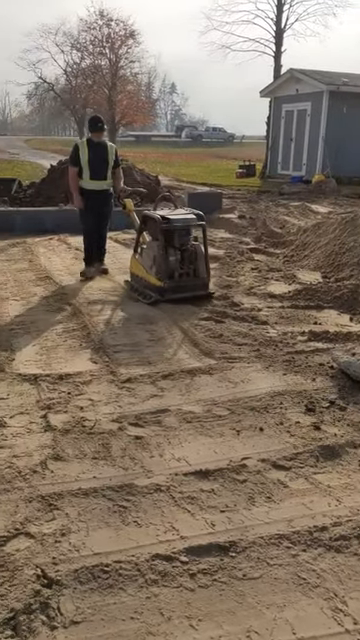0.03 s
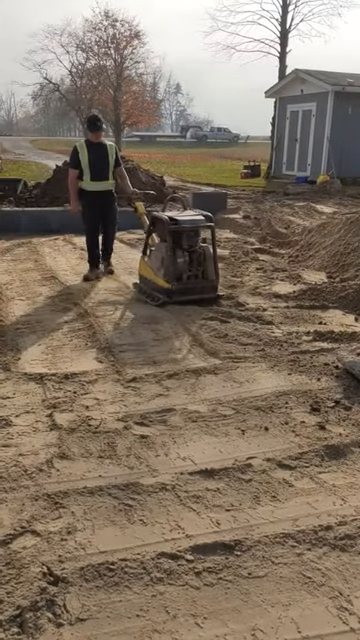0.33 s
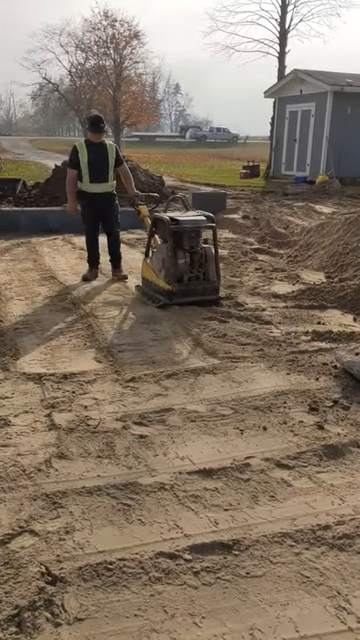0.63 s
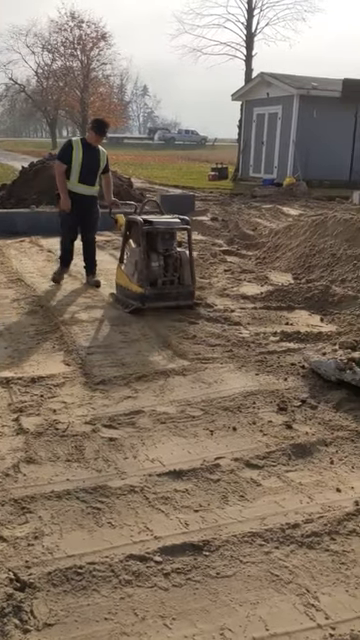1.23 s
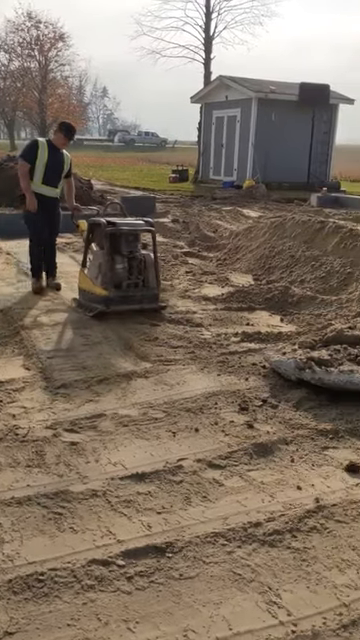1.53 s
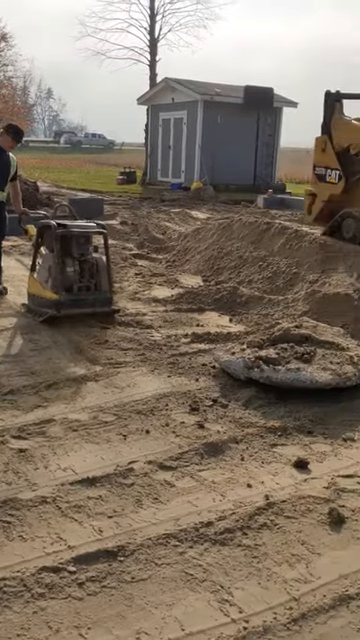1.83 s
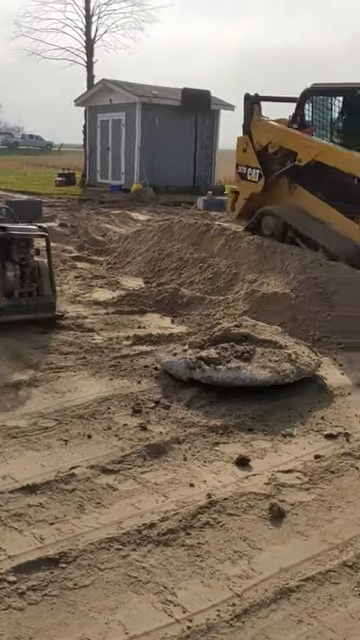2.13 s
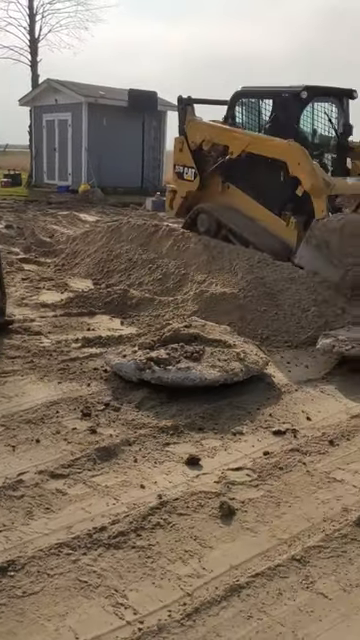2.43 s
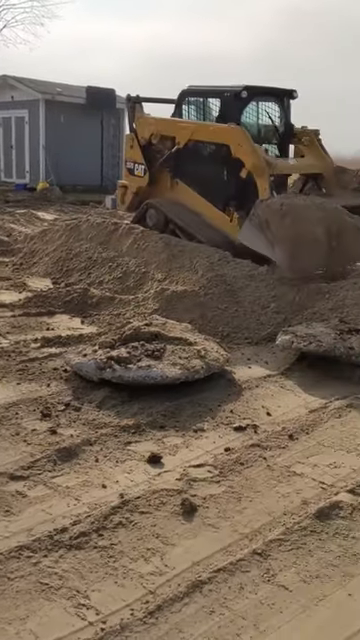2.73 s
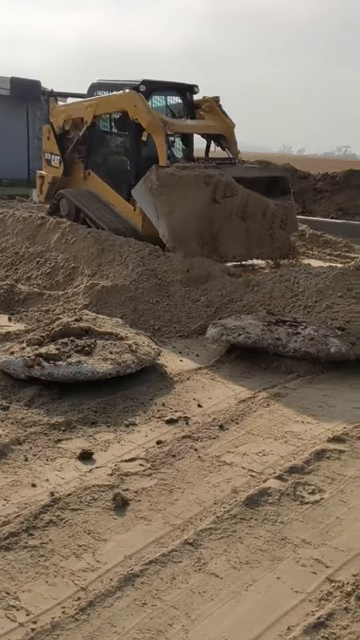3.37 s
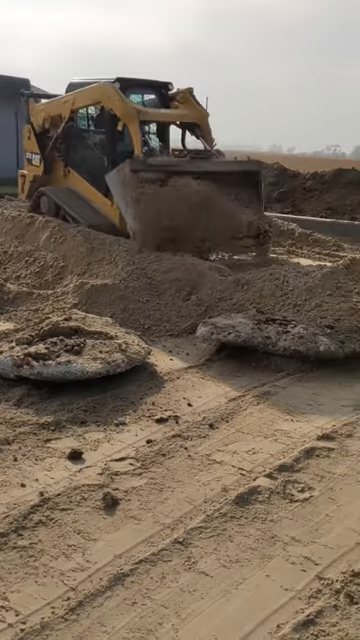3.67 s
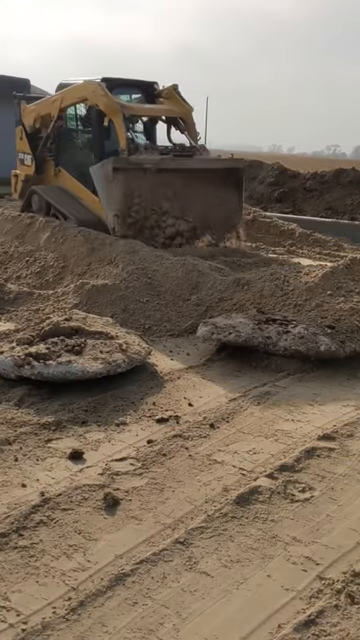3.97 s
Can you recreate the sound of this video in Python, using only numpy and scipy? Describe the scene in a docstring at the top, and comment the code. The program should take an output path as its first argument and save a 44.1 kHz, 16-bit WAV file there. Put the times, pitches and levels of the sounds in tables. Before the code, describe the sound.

Steady pulsing drone and diesel clatter of a plate compactor, with a loader faintly behind.

```python
"""A plate compactor works on sand a few metres away, in open air, beside a tracked loader.
From the start the plate thumps 65 times a second and the ground rumbles, while its one-cylinder diesel
knocks, barks and ticks once in every two turns and the loader's tracks moan. Within a second the guard
frame buzzes and a faint hydraulic whine swells. Near 2 s the ticks change colour as the microphone
turns away; then a hiss grows as the loader tips its bucket."""
import sys
import numpy as np
from scipy import signal
from scipy.fft import rfft, irfft
from scipy.io import wavfile
from scipy.ndimage import uniform_filter1d

SR = 44100
rng = np.random.default_rng(int(sys.argv[2]) if len(sys.argv) > 2 else 0)


def master(y):
    """Save y as 16-bit WAV."""
    cut = np.clip(np.atleast_2d(y).T, -1, 1)
    pcm = np.round(cut * 32767)  # scale
    wavfile.write(sys.argv[1], SR, pcm.astype(np.int16))


N = 176400


def undb(db):
    """Decibels to amplitude ratio."""
    return 10 ** (np.asarray(db) / 20)


def unit(x):
    """Normalisation to rms 1."""
    return x / np.sqrt(np.mean(x ** 2))


def curve(rows):
    """Linear interpolation of (time_s, value) rows."""
    return np.interp(np.arange(N) / SR, *np.array(rows, float).T)


def drift(rate_hz):
    """Smooth random fluctuation with spread near 1."""
    hold = int(SR / max(rate_hz, .3))
    steps = np.repeat(rng.standard_normal(N // hold + 1), hold)
    return 1.3 * uniform_filter1d(uniform_filter1d(steps, hold), hold)[:N]


def colour(x, spectrum):
    """Spectral shaping by (frequency_hz, gain_db) rows; rms 1."""
    hz, db = np.array(spectrum, float).T
    bins_hz = np.maximum(np.fft.rfftfreq(N, 1 / SR), 1)
    gain = undb(np.interp(np.log(bins_hz), np.log(hz), db))
    return unit(irfft(rfft(x) * gain, N))


def resonate(x, hz, t60_s):
    """Two like damped resonators in cascade: the impulse response swells, then decays; rms 1."""
    pole = np.exp((2j * np.pi * hz - np.log(1000) / t60_s) / SR)
    for _ in range(2):
        x = unit(signal.lfilter([1], [1, -pole], x).imag)
    return x


def rattle(cycle, repeats, size=2048):
    """Partly periodic noise: the share `repeats` of its power recurs in every engine cycle."""
    pattern = unit(irfft(np.exp(2j * np.pi * rng.random(size // 2 + 1))))
    periodic = unit(np.interp(cycle % 1 * size, np.arange(size), pattern))
    return np.sqrt(repeats) * periodic + np.sqrt(1 - repeats) * rng.standard_normal(N)


def burst(cycle, phase, decay_s, attack_s=.00048):
    """Exponential rise and decay, starting at one phase (0-1) of each engine cycle."""
    age_s = (cycle - phase) % 1 / (cycle[-1] - cycle[0]) * N / SR
    return (1 - np.exp(-age_s / attack_s)) * np.exp(-age_s / decay_s)


# Blows of the plate: time_s, rate_hz
PLATE_RATE = [(0, 65.55), (.6, 65.75), (1.15, 65.4), (1.8, 65.12), (2.6, 65.4), (3.2, 65.55), (4, 65.55)]
# Harmonics 1, 2, 3 and 5 (the base plate's boom): time_s, level_db
THUMP_LEVEL = [(0.05, -17), (0.08, -17), (1.62, -14), (1.67, -15), (3.37, -14.5), (3.86, -16.5),
               (3.95, -16)]
OCTAVE_LEVEL = [(0.05, -18.5), (1.1, -17), (1.58, -20.5), (3.53, -18.5), (3.83, -19.5), (3.95, -20.5)]
TWELFTH_LEVEL = [(0.05, -22.5), (0.32, -24.5), (0.78, -26.5), (0.85, -28), (0.94, -40), (0.97, -28.5),
                 (1.67, -20.5), (3.44, -23.5), (3.74, -36.5), (3.95, -42)]
BOOM_LEVEL = [(0, -29), (.25, -27), (.55, -44), (1.15, -35), (1.8, -37.5), (2.3, -33.5), (2.9, -41.5),
              (3.15, -31), (3.5, -24), (3.75, -24.5), (4, -20.5)]
# Buzz of the slap, strongest on firm ground: time_s, level_db
SLAP_LEVEL = [(0, -26), (.3, -24), (.55, -27), (1.2, -35), (1.6, -30.5), (2, -30.5), (2.4, -38),
              (2.9, -27.5), (3.15, -25.5), (3.45, -24.5), (3.75, -24.5), (4, -24)]
# Overtones of the slap: harmonic, loose_sand_gain_db, firm_ground_gain_db
SLAP_HARMONICS = [(4, -5, -5), (6, -19.5, -4), (7, -16, -18)]

def plate(cycle):
    """Periodic impact: the plate swings as a sine, hitting sand adds harmonics, the crank rocks it."""
    phase = 2 * np.pi * (-.29 + np.cumsum(curve(PLATE_RATE)) / SR) + .012 * drift(24)
    swing = undb(curve(THUMP_LEVEL)) * np.cos(phase)
    contact = undb(curve(OCTAVE_LEVEL) + .21 * drift(20)) * np.sin(2 * phase)
    contact += undb(curve(TWELFTH_LEVEL) + .73 * drift(33)) * np.sin(3 * phase)
    contact += undb(curve(BOOM_LEVEL)) * np.sin(5 * phase + .15 * drift(10))
    slap_db = curve(SLAP_LEVEL)
    firmness = np.interp(slap_db, [-26.5, -24], [0, 1])
    waver = 1 - firmness / 2  # firm ground steadies the overtones
    for harmonic, loose_db, firm_db in SLAP_HARMONICS:
        db = slap_db + loose_db + firmness * (firm_db - loose_db) + 2 * waver * drift(11)
        contact += undb(db) * np.sin(harmonic * phase + .49 * waver * drift(9.2))
    rocking = np.cos(2 * np.pi * 2 * cycle)  # once per crank turn
    return np.sqrt(2) * (swing * (1 + .048 * rocking) + contact * (1 + .097 * rocking))


# Spectrum of the shaken ground: frequency_hz, gain_db
RUMBLE_SPECTRUM = [(20, -6), (45, -3), (82, 15), (100, 4), (140, 4), (220, 8.5), (290, 0.5), (370, 9),
                   (440, -0.5), (550, -13.5), (800, -46.5)]

def ground_rumble():
    """Random vibration: the shaken ground radiates low-frequency noise."""
    return undb(-33) * colour(rng.standard_normal(N), RUMBLE_SPECTRUM)


# Tones at multiples of the firing rate: harmonic, level_db
ENGINE_HARMONICS = [(2, -37.5), (3, -40.5), (4, -46.5), (5, -41), (6, -39.5), (7, -40), (8, -40), (9, -43),
                    (10, -36.5), (14, -44), (26, -52), (29, -51), (30, -44.5), (38, -48), (49, -43.5),
                    (72, -51.5)]

def engine_tones(cycle):
    """Harmonic series of the firing rate: low tones from the silencer, high ones from gears and fan."""
    tones = 0
    for harmonic, db in ENGINE_HARMONICS:
        tones += undb(db + 2.7 * drift(8.45)) * np.sin(2 * np.pi * (harmonic * cycle + rng.random()))
    return np.sqrt(2) * tones


# Modes of the engine block: pitch_hz, t60_s, level_db, delay_s
BLOCK_MODES = [(1110, .017, -30.7, -.0012), (1540, .011, -39.5, -.0015), (1740, .013, -41, 0),
               (1930, .013, -40, .003)]
# The block's ring at the moving microphone: time_s, gain_db
BLOCK_GAIN = [(0, -4.3), (1.2, -3.5), (2.1, -2.5), (2.7, -3.9), (3.5, -2.2), (4, -1.5)]

def engine_block(cycle):
    """Impulse excitation: each firing strikes the block almost alike, and its modes ring."""
    firing_phase, jitter_s, scatter_db = .44, .00003, .7
    firings = np.interp(np.arange(int(cycle[-1]) + 1) + firing_phase, cycle, np.arange(N))
    modes = 0
    for hz, t60_s, db, delay_s in BLOCK_MODES:
        timing, force = rng.standard_normal((len(firings), 2)).T
        onsets = np.abs(firings + (delay_s + jitter_s * timing) * SR).astype(int)
        blows = np.bincount(onsets, undb(scatter_db * force), N)[:N]
        modes += undb(db) * resonate(blows, hz, t60_s)
    return undb(curve(BLOCK_GAIN)) * modes


# Spectra of frame clatter, combustion knock, exhaust bark and piston slap: frequency_hz, gain_db
FRAME_SPECTRUM = [(480, -15.5), (570, -12.5), (700, -1), (900, -4), (1050, 0.5), (1180, -5), (1300, -4),
                  (1600, -2.5), (1950, -1.5), (2250, -2.5), (2500, -11.5), (3200, -10), (3650, -18.5),
                  (4200, -34.5), (4700, -28), (6000, -34), (8000, -35.5), (11000, -45), (15500, -59)]
KNOCK_SPECTRUM = [(600, -37), (850, -6), (1000, -13), (1200, -18), (1380, 2), (1600, 4), (2300, -1),
                  (3200, -5), (4100, -29), (5600, -19), (7500, -25.5), (14000, -62)]
BARK_SPECTRUM = [(450, -38), (640, 2), (760, -0.5), (1000, -4.5), (1400, -1), (2000, -14), (3500, -32)]
PISTON_SPECTRUM = [(700, -9), (1300, -3), (1950, 11), (2500, -6), (3300, -7.5), (4200, -21), (7000, -29),
                   (14000, -49)]
# All four together: time_s, gain_db
CLATTER_GAIN = [(0, -27.5), (.8, -27.5), (1.7, -27.5), (2.7, -29), (3.6, -28.5), (4, -30.5)]

def clatter(cycle):
    """Cyclostationary noise: knock, bark and piston slap come in turn over gear and frame clatter."""
    frame = undb(drift(90)) * colour(rattle(cycle, repeats=.36), FRAME_SPECTRUM)
    knock = rattle(cycle, repeats=.29) * burst(cycle, phase=.42, decay_s=.0046)
    bark = rattle(cycle, repeats=.56) * burst(cycle, phase=.614, decay_s=.0092)
    piston = rattle(cycle, repeats=.34) * burst(cycle, phase=.873, decay_s=.0089)
    pulses = (undb(-13.5) * colour(knock, KNOCK_SPECTRUM)
              + undb(-11.5) * colour(bark, BARK_SPECTRUM)
              + undb(-8.5) * colour(piston, PISTON_SPECTRUM))
    return undb(curve(CLATTER_GAIN)) * (frame + pulses)


# Valve and injector ticks: phase_cycles, decay_s, gain_db
TICKS = [(.14, .0045, 0), (.37, .004, -3), (.86, .005, -.5)]
# Ticks and sizzle together: time_s, gain_db
TICK_GAIN = [(0, -55), (1.2, -52.5), (1.7, -54), (2.2, -54.5), (2.6, -59), (3.1, -58), (3.4, -56), (4, -58)]
# Their spectra with the microphone facing and turned away: frequency_hz, gain_db
FACING_SPECTRUM = [(3500, 1), (4700, 8), (5300, -20), (5900, 9.5), (6700, 0), (7400, 5.5), (8200, -8),
                   (8900, 5), (9800, 6), (11000, 1), (12000, -14), (13700, 2), (15500, -13)]
TURNED_SPECTRUM = [(4000, -10), (6000, 8), (7300, -6), (8300, 1.5), (9400, -6), (10200, 0), (11000, 3.5),
                   (12000, -11), (12900, -10), (13600, 0), (14400, -11), (15500, -13)]

def valves(cycle):
    """Directivity: three bright ticks a cycle, over a sizzle, change colour as the microphone turns."""
    envelope = undb(-12)  # the steady sizzle
    for phase, decay_s, db in TICKS:
        envelope += undb(db + 2 * drift(24.2)) * burst(cycle, phase, decay_s, attack_s=.0012)
    ticks = envelope * rng.standard_normal(N)
    turned = curve([(1.6, 0), (2.2, 1)])
    heard = (1 - turned) * colour(ticks, FACING_SPECTRUM) + turned * colour(ticks, TURNED_SPECTRUM)
    return undb(curve(TICK_GAIN) - 1) * heard


# Thin ring carried by each knock: time_s, level_db
PING_LEVEL = [(0, -59), (1.8, -72), (2.4, -57.5), (4, -55.5)]

def sheet_metal_ping(cycle):
    """Shock excitation: each knock sets a high sheet-metal mode ringing."""
    knocks = burst(cycle, phase=.424, decay_s=.0081) * rng.standard_normal(N)
    return undb(curve(PING_LEVEL)) * resonate(knocks, hz=5594, t60_s=.0057)


# Rubbing of the loader's tracks: time_s, level_db
MOAN_LEVEL = [(0, -33), (.6, -39.5), (.8, -33), (1, -41), (1.8, -42), (2.15, -34.5), (2.45, -34),
              (2.65, -29.5), (2.85, -41.5), (3.4, -37), (3.75, -31.5), (4, -40)]

def track_moan():
    """Friction noise through a narrow resonance, whose bandwidth sets its decay time."""
    pitch_hz, bandwidth_hz = 884.6, 71
    t60_s = np.log(1000) / np.pi / bandwidth_hz
    return undb(curve(MOAN_LEVEL)) * resonate(rng.standard_normal(N), pitch_hz, t60_s)


# Buzz of the guard frame: time_s, level_db
GUARD_LEVEL = [(0, -61), (.85, -34), (1.6, -38), (2.2, -42.5), (3, -44), (3.6, -36), (4, -41)]

def guard_frame(cycle):
    """Forced vibration: the steel guard, shaken much alike in each cycle, rings near one pitch."""
    return undb(curve(GUARD_LEVEL)) * resonate(rattle(cycle, repeats=.64), hz=1900, t60_s=.01)


# Strength of the pump's whine: time_s, level_db
WHINE_LEVEL = [(0, -57), (.7, -46.5), (1.6, -42.5), (2, -52), (2.7, -52), (3.4, -51), (4, -63)]
# Its frequency: time_s, pitch_hz
WHINE_PITCH = [(0, 505), (.7, 512), (1.5, 509), (2, 502), (2.8, 499), (4, 501)]

def pump_whine():
    """Amplitude and frequency modulation: the hydraulic pump's pure tone wavers slightly."""
    amplitude = np.sqrt(2) * undb(curve(WHINE_LEVEL) + drift(5))
    pitch_hz = curve(WHINE_PITCH) + drift(10)
    return amplitude * np.sin(2 * np.pi * np.cumsum(pitch_hz) / SR)


# Strength of the hiss: time_s, level_db
HISS_LEVEL = [(0, -53), (1.8, -66), (2.4, -52.5), (3.4, -51.5), (4, -51.5)]
# Its spectrum: frequency_hz, gain_db
HISS_SPECTRUM = [(3500, -26), (4300, -10), (4800, 9.5), (5200, -6), (5600, 6), (6100, 0), (6600, 2.5),
                 (7400, -24), (10000, -38)]

def bucket_hiss():
    """Band-limited noise: a high hiss grows as the bucket tips its sand."""
    amplitude = undb(curve(HISS_LEVEL) + 1.05 * drift(40))
    return amplitude * colour(rng.standard_normal(N), HISS_SPECTRUM)


# Speed of the diesel: time_s, speed_rpm
ENGINE_SPEED = [(0, 2873), (1.3, 2873), (1.6, 2862), (1.95, 2872), (2.8, 2871), (4, 2877)]

def scene():
    """Superposition of compactor, loader and ground; one cycle count times all the engine's sounds."""
    cycle = .14 + np.cumsum(curve(ENGINE_SPEED)) / SR / 120  # two crank turns per cycle
    cycle += .005 * drift(3)
    ground = ground_rumble()
    compactor = (plate(cycle) + engine_tones(cycle) + engine_block(cycle) + guard_frame(cycle)
                 + sheet_metal_ping(cycle) + clatter(cycle) + valves(cycle))
    loader = pump_whine() + track_moan() + bucket_hiss()
    return (compactor + loader + ground)[None]


def record(dry):
    """Band limiting: a steep low-pass filter cuts the highest treble."""
    cutoff_hz = 15700
    return signal.sosfilt(signal.ellip(10, .1, 80, cutoff_hz, fs=SR, output="sos"), dry)


dry = scene()
out = record(dry)
master(out)
```